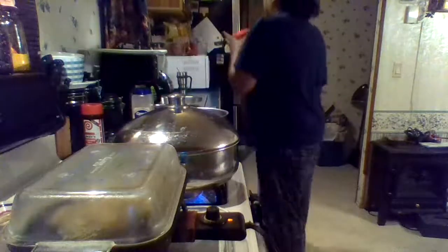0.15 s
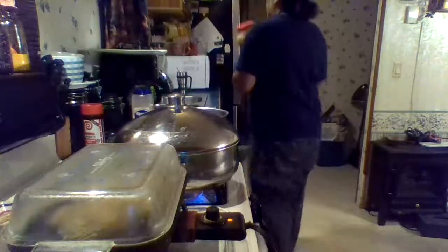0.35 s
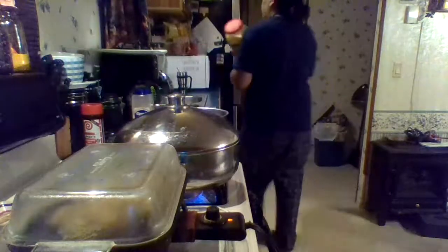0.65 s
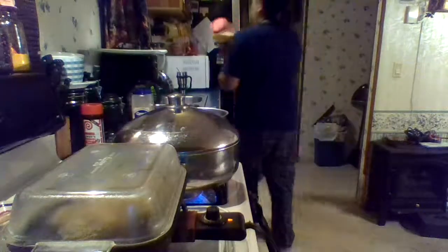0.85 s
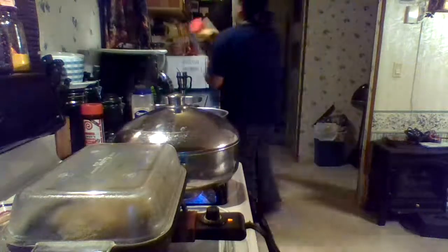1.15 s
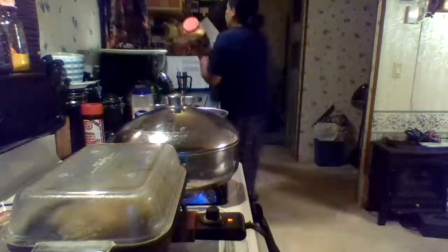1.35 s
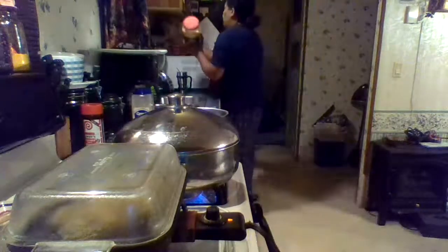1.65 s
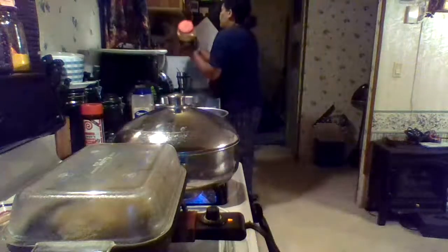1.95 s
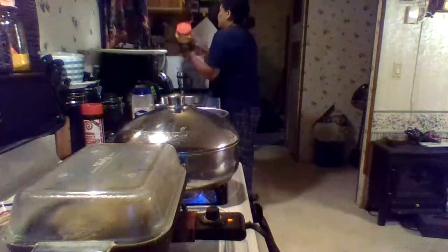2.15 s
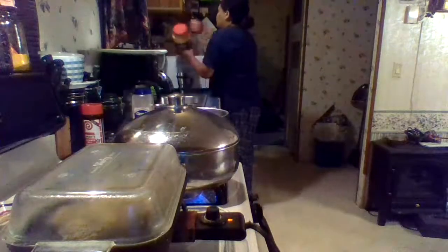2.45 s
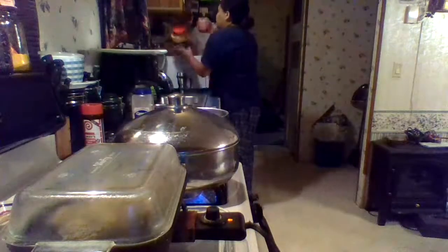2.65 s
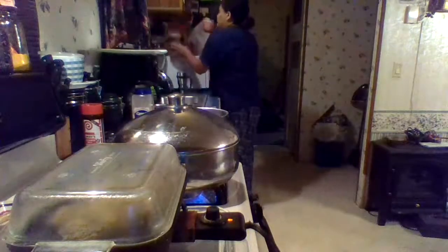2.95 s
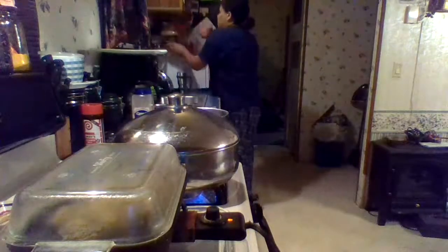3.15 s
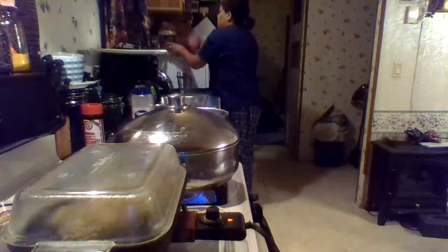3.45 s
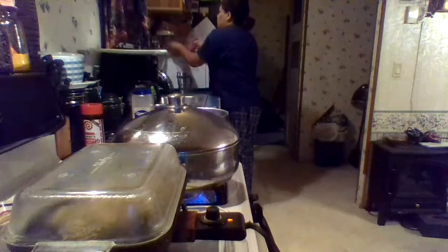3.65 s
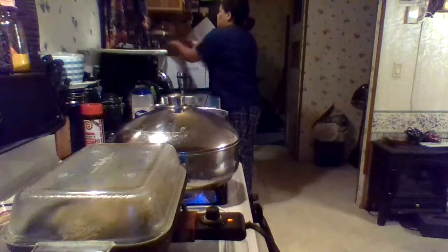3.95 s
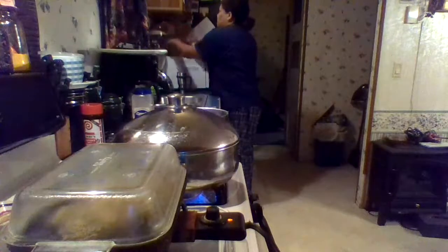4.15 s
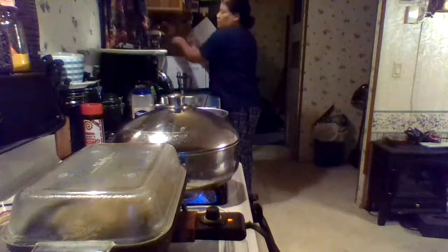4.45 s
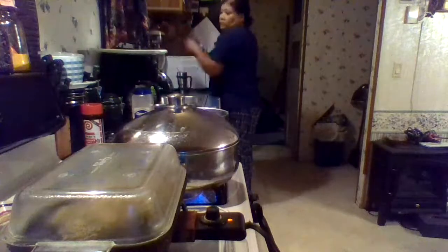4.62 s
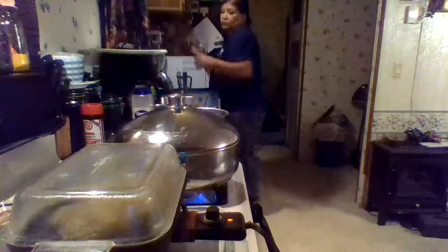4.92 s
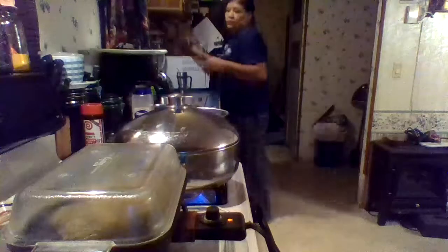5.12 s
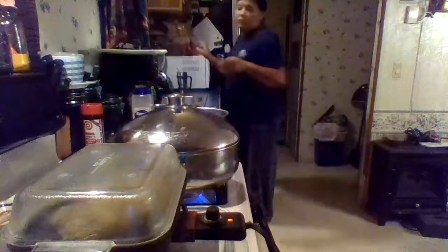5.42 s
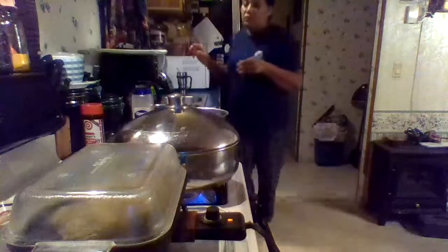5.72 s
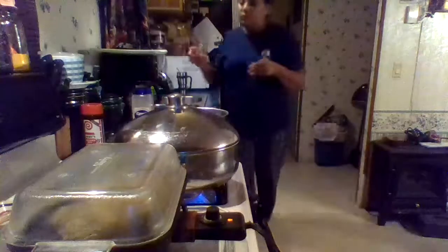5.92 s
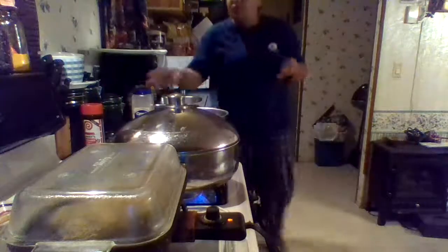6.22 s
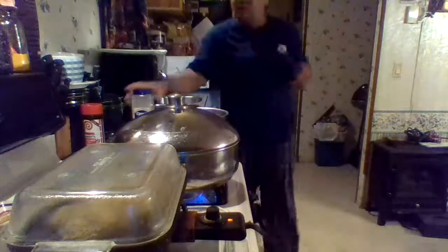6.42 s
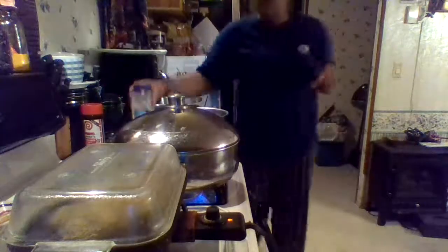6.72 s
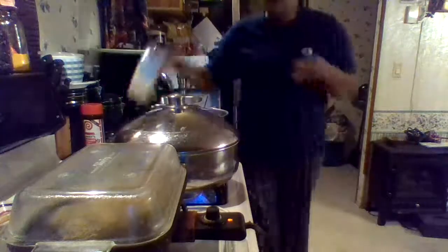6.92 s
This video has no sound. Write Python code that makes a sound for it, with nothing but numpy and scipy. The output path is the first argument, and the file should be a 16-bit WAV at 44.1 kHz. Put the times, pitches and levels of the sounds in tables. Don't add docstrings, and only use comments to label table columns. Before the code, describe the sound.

A small microphone close to a stove picks up fish frying in a covered pan in a small home kitchen. Throughout, oil simmers with fine airy hiss and dense irregular crackle; pockets burst as short wet sputters with a hollow, metallic mid-high ring. Bright droplet ticks and fizzing spits stand out at about 1.1, 2.1, 3.2, 4.7, 5.2 and 5.6 s. Soft jar taps come faintly near 1.7 s, then low dull thumps at 2.7-2.9 s. Boiling eases slightly near 3.6 s, then the loudest pop cracks at 3.7 s, a full, sharp snap with sputtering after it. Duller knocks with a slight clack follow at 4.15-4.3 s, fainter ones near 4.9 s. From 5.7 to 6.3 s pops cluster thickly; sputtering continues to another strong burst at 7 s. A faint burner and room murmur lies beneath; reverberation is short and slight.

```python
import sys
import numpy as np
from scipy import signal
from scipy.fft import rfft, irfft, next_fast_len
from scipy.io import wavfile
from scipy.ndimage import uniform_filter1d, map_coordinates

SR = 44100
rng = np.random.default_rng(int(sys.argv[2]) if len(sys.argv) > 2 else 0)


def amp(db):
    return 10 ** (np.asarray(db, float) / 20)


def write(x):
    x = np.atleast_2d(x).T
    wavfile.write(sys.argv[1], SR, np.round(np.clip(x, -1, 1) * 32767).astype(np.int16))


N = 312228

# frequency in Hz, bandwidth in Hz, level in dB.
PAN_MODES = [(976, 58, -3.5), (1168, 21, -18.5), (1324, 35, -7), (1464, 63, -5), (1552, 94, -4),
             (1720, 60, 0), (1788, 21.8, 4.5), (1870, 32, -0.5), (2116, 38, -2.5), (2278, 157, -3),
             (2540, 270, -11.5), (2417, 15, -8), (2664, 24.5, 0), (2850, 24.5, 2.5), (3150, 21, 0),
             (3290, 70, 0.5), (3420, 30, -7.5), (3627, 34, -2.5), (3970, 38, -12.5), (4480, 36, -15),
             (4200, 23, -4), (4573, 155, -3), (4800, 160, -17), (5083, 66, -3), (6090, 87, -10.5),
             (6820, 99, -5)]
# frequency in Hz, bandwidth in Hz, level in dB.
BOARD_MODES = [(185, 98, -6.5), (226, 68, 3.5), (347, 97, 3), (432, 26, 6), (577, 210, -0.5),
               (656, 17, 5.5), (768, 7.9, -8)]


def unit(x):
    return x / np.sqrt(np.mean(x ** 2) + 1e-20)


def peak_one(rows):
    return rows / np.max(np.abs(rows), axis=1, keepdims=True)


def along(points, hz):
    f, value = np.transpose(points)
    return np.interp(np.log(hz + 1), np.log(f + 1), value)


def over_time(points):
    s, db = np.transpose(points)
    return np.interp(np.arange(N) / SR, s, db)


def wobble(rate):
    knots = rng.standard_normal(int(N * rate / SR) + 4)
    return map_coordinates(knots, [np.arange(N) * rate / SR])


def filtered(x, response):
    n = x.shape[-1]
    m = next_fast_len(n + 4096)
    return irfft(rfft(x, m) * response(np.fft.rfftfreq(m, 1 / SR)), m)[..., :n]


def resonance(f, hz, width_hz):
    return 1j * f * width_hz / (hz * hz - f * f + 1j * f * width_hz)


def body(modes, strength_db):
    hz, width_hz, db = np.transpose(modes)
    gains = amp(db + strength_db) * (-1.) ** np.arange(len(modes))
    return lambda f: gains @ resonance(f, hz[:, None], width_hz[:, None])


def placed(times, rows):
    at = np.round(times * SR).astype(int)[:, None] + np.arange(rows.shape[1])
    return np.bincount(at.ravel(), rows.ravel(), N + SR)[:N]


def sputter(length, size, first_db, grain_db, shape):
    t = np.arange(size) / SR
    noise, grain_noise = rng.standard_normal((2, len(length), size))
    grains = amp(grain_db * unit(uniform_filter1d(grain_noise, size=56)))
    decay = amp(-20 * (t / np.maximum(length, 0.003)[:, None]) ** shape)
    onset = 1 - np.exp(-t / 0.001)
    crack = np.outer(amp(first_db + 0 * length), t == 0)
    return noise * grains * decay * onset + crack


def pan_for_each(count):
    return body(PAN_MODES, rng.normal(0, 4.9, (count, len(PAN_MODES))))


def bursts(hz, length, spread, size, first_db):
    burst = sputter(length, size=size, first_db=first_db, grain_db=5.0, shape=1.71)
    pan = pan_for_each(len(hz))
    lid_echo_s, lid_returns = 0.0043, 0.39

    def near(f, width):
        return resonance(f, hz[:, None], width * hz[:, None]) ** 2

    def response(f):
        pocket = near(f, 0.21 * spread) + amp(-6.5) * near(f, spread) ** 1.41
        pocket = pocket + amp(-35) * resonance(f, 5700, 4700)
        echoes = 1 / (1 - lid_returns * np.exp(-2j * np.pi * f * lid_echo_s))
        return pocket * (pan(f) + amp(-8.5) * resonance(f, 4720, 8500) * echoes)

    return peak_one(filtered(burst, response))


def droplets(hz, width_hz, length, first_db, size):
    tick = sputter(length + 0 * hz, size=size, first_db=first_db, grain_db=1.5, shape=0.9)
    return peak_one(filtered(tick, lambda f: resonance(f, hz[:, None], width_hz) ** 2))


def pops():
    # start in seconds, peak in dB, pocket pitch in Hz, sputter in seconds.
    deep_pockets = [(0.319, -25, 1720, 0.025), (0.359, -29, 3180, 0.03), (0.794, -23.5, 1760, 0.0078),
                    (0.938, -23, 2610, 0.054), (1.316, -24, 2310, 0.018), (1.658, -32, 1720, 0.14),
                    (1.922, -23.5, 3340, 0.028), (2.8, -26.5, 3070, 0.028), (2.8873, -25.5, 2290, 0.022),
                    (3.135, -25, 2060, 0.032), (3.302, -36, 2290, 0.023), (3.7045, -10, 1860, 0.034),
                    (4.026, -31, 2460, 0.045), (4.095, -30, 2330, 0.0086), (4.306, -26.5, 2650, 0.059),
                    (4.811, -25.5, 2350, 0.026), (4.915, -31, 1810, 0.017), (4.94, -25, 2240, 0.022),
                    (5.14, -23, 1390, 0.017), (5.185, -23, 2570, 0.028), (5.482, -31, 2680, 0.075),
                    (5.517, -22, 2760, 0.017), (5.618, -22.5, 1830, 0.027), (5.754, -28, 1690, 0.034),
                    (5.812, -17.5, 1540, 0.0078), (5.88, -25.5, 1905, 0.045), (5.9854, -22.5, 1730, 0.012),
                    (6.2372, -21, 3180, 0.065), (6.589, -23.5, 2290, 0.04), (4.145, -27, 2800, 0.048)]
    # start in seconds, peak in dB, pocket pitch in Hz, sputter in seconds.
    shallow_pockets = [(0.04, -26, 3160, 0.075), (0.384, -23, 2900, 0.04), (0.423, -24, 2210, 0.063),
                       (0.578, -22.5, 3190, 0.1), (0.843, -27, 2240, 0.05), (1.215, -26.5, 3150, .038),
                       (1.253, -22.5, 2770, 0.01), (1.282, -26, 1990, 0.13), (1.376, -21.5, 3080, 0.041),
                       (1.532, -26.5, 3150, 0.061), (1.842, -24, 2850, 0.037), (1.951, -20.5, 3330, 0.032),
                       (1.967, -27, 3360, 0.15), (3.733, -25, 6600, 0.099), (2.234, -24.5, 3270, 0.017),
                       (2.263, -27.5, 2800, 0.069), (2.466, -25, 2880, 0.07), (3.116, -24.5, 1930, 0.034),
                       (3.6588, -21, 2420, 0.17), (3.883, -22, 2920, 0.058), (3.927, -20, 2400, 0.013),
                       (4.234, -23.5, 2990, 0.055), (4.392, -22.5, 2540, 0.027), (4.502, -25, 2020, 0.086),
                       (5.554, -22.5, 2500, 0.06), (6.032, -24, 3630, 0.086), (6.282, -21, 2690, 0.038),
                       (6.6993, -22.5, 2850, 0.056), (6.99, -24, 2880, 0.087), (7.035, -16, 2030, 0.035)]
    # start in seconds, peak in dB, pocket pitch in Hz.
    weak_pockets = [(0.152, -31.5, 2400), (0.284, -28.5, 2140), (1.108, -30.5, 3220), (1.186, -32, 3070),
                    (1.496, -24, 3500), (2.02, -26.5, 2200), (2.184, -30.5, 2500), (2.307, -29.5, 3540),
                    (2.396, -27.5, 2730), (2.502, -24.5, 3150), (2.604, -25, 2490), (2.652, -25.5, 2860),
                    (2.7, -25, 2430), (2.934, -29, 3270), (4.065, -29, 2400), (4.3687, -25.5, 2900),
                    (4.6178, -29, 2540), (4.77, -25, 3770), (4.979, -25.5, 3150), (5.126, -25.5, 2960),
                    (5.193, -29, 1240), (5.5744, -31, 2520), (5.831, -31, 2760), (6.146, -31.5, 2780),
                    (3.495, -35, 3300), (6.386, -28, 3700), (6.492, -25, 2840), (6.773, -28.5, 3150),
                    (6.865, -26, 2676), (2.089, -23, 3090)]
    # start in seconds, peak in dB, pocket pitch in Hz.
    small_pockets = [(0.3511, -29, 5900), (0.5132, -30, 5160), (0.618, -27.5, 3980), (0.9946, -27, 4980),
                     (0.858, -29.5, 4360), (1.3588, -30.5, 3660), (1.5713, -28.5, 4260),
                     (1.8123, -25, 4380), (2.0852, -23, 6570), (2.1864, -25.5, 4650), (2.228, -25, 3900),
                     (2.4755, -26.5, 4480), (3.6785, -32, 4070), (3.7234, -25, 3840), (3.7703, -28.5, 3860),
                     (4.0706, -26.5, 4200), (4.2722, -26.5, 4100), (4.334, -28.5, 4020),
                     (4.7232, -35, 6000), (4.742, -26.5, 4800), (4.9013, -30, 4170), (5.244, -27.5, 4400),
                     (5.8017, -29, 3170), (5.8895, -21.5, 4200), (6.0247, -26, 4070), (6.0427, -18.5, 4200),
                     (6.6099, -27, 4620), (3.402, -38, 4300), (6.8957, -26.5, 4380), (5.865, -27.5, 3600)]
    weak_s = 0.039

    weak_rows = [row + (weak_s,) for row in weak_pockets]
    s, db, hz, length = np.transpose(deep_pockets + shallow_pockets + weak_rows)
    deep = np.arange(len(s)) < len(deep_pockets)
    low_db = np.where(deep, -38 + 0.33 * (db + 23.0), db - 33)
    large = amp(db - 2.0)[:, None] * bursts(hz, length, spread=0.67, size=6144, first_db=24.0)
    low_bursts = bursts(0 * hz + 1150, 1.35 * length, spread=0.98, size=6144, first_db=1.0)
    low = amp(low_db + 5.0)[:, None] * low_bursts
    shake = sputter(2.0 * length, size=6144, first_db=5.0, grain_db=15.0, shape=0.54)
    stove = amp(db - 26)[:, None] * peak_one(filtered(shake, body(BOARD_MODES, 0)))

    freed_db = np.minimum(db - 16.5, -33)
    freed_hz = 4100 * amp(3.5 * rng.random(len(s)))
    s_small, db, hz = np.r_[small_pockets, np.c_[s, freed_db, freed_hz]].T
    small = amp(db - 0.5)[:, None] * bursts(hz, 0.043 + 0 * hz, spread=0.6, size=6144, first_db=27.0)
    return placed(s, large + low + stove) + placed(s_small, small)


def snaps():
    # start in seconds, peak in dB, pitch in Hz.
    single_bubbles = [(0.3238, -29, 1703), (0.3793, -20.5, 2440), (0.386, -26, 3080), (0.3925, -18, 3400),
                      (0.4294, -21, 2220), (0.4383, -19.5, 2090), (1.072, -21.5, 4600),
                      (1.2486, -17.5, 2850), (1.3147, -13, 2390), (1.3912, -21, 3540), (1.8133, -18, 4360),
                      (1.9264, -22.5, 1720), (1.977, -13, 3360), (3.7056, -10.5, 1800), (2.228, -23, 3470),
                      (2.2376, -19, 3240), (2.2527, -23, 4030), (2.27, -17, 3380), (2.467, -22, 2680),
                      (2.477, -19, 2710), (2.5019, -19, 4500), (2.8942, -17.5, 2350), (3.115, -21, 2150),
                      (3.1402, -22.5, 2050), (3.678, -22.5, 4250), (3.7008, -7, 2240), (3.7303, -18, 1830),
                      (3.762, -26, 3920), (3.7712, -21, 4930), (3.7834, -22, 4890), (3.8904, -15, 2670),
                      (3.9256, -30, 2720), (4.0702, -24.5, 4050), (4.0955, -14.5, 2300), (4.235, -20, 2940),
                      (4.309, -24, 2540), (4.3154, -22, 1760), (4.3959, -23, 2400), (4.8195, -25, 2330),
                      (5.184, -19, 2650), (5.196, -25.5, 1500), (5.2517, -21, 4130), (4.6205, -24, 2700),
                      (5.821, -18.5, 2470), (5.832, -17.5, 2800), (5.8823, -22, 3530), (5.891, -15, 4020),
                      (5.9866, -17, 1770), (6.036, -20, 4290), (6.044, -20, 4350), (6.0631, -19, 3530),
                      (6.0702, -19, 4460), (6.2477, -26, 3470), (6.2878, -14.5, 2500), (6.7123, -21, 2730),
                      (6.778, -17.5, 4240), (6.8965, -18, 4470), (6.992, -26, 3020), (7.0083, -15.5, 2710),
                      (7.0569, -21, 2100)]
    # start in seconds, peak in dB, pitch in Hz, sputter in seconds.
    stray_pockets = [(0.347, -28.5, 3240, 0.062), (0.529, -33, 4800, .04), (0.745, -38, 2600, .03),
                     (1.517, -39, 6500, 0.079), (2.84, -34, 4500, 0.083), (2.843, -31.5, 2130, 0.025),
                     (2.986, -34, 4060, 0.021), (3.104, -35.5, 4100, 0.024), (4.307, -40, 1015, 0.028),
                     (4.549, -29.5, 3260, 0.028), (3.602, -39, 4540, 0.035), (4.624, -37, 6240, 0.083),
                     (3.304, -35, 4500, 0.047), (4.691, -41, 5100, .02), (5.095, -32, 4300, 0.028),
                     (5.281, -31, 4400, 0.014), (5.823, -30, 4370, 0.011), (5.93, -32.5, 3300, .03),
                     (5.986, -22, 1790, 0.047), (6.061, -27.5, 2700, 0.036), (6.217, -40.5, 1050, 0.03),
                     (6.312, -23, 2680, 0.019), (0.116, -34.5, 2400, 0.02), (0.168, -33.5, 4370, 0.013),
                     (1.593, -32, 2710, 0.071), (1.726, -32.5, 5300, 0.06), (1.703, -37.5, 2320, 0.092),
                     (4.742, -31, 6300, 0.044), (4.809, -31.5, 5260, 0.025), (4.983, -36, 4570, 0.028),
                     (5.049, -39, 6160, .03), (5.18, -37, 4000, 0.049), (0.784, -36.5, 6300, 0.068),
                     (0.923, -36, 4670, .045), (6.955, -37, 2670, 0.046), (7.022, -27.5, 4200, 0.062)]

    s, db, hz = np.transpose(single_bubbles)
    blow = np.outer(1 + 0 * s, np.arange(4096) == 0)
    pan = pan_for_each(len(s))

    def response(f):
        bubble = resonance(f, hz[:, None], 0.17 * hz[:, None]) ** 3
        return bubble * (1 + amp(1.5) * pan(f))

    bubbles = placed(s, amp(db - 5.5)[:, None] * peak_one(filtered(blow, response)))
    s, db, hz, length = np.transpose(stray_pockets)
    strays = amp(db)[:, None] * bursts(hz, length, spread=0.38, size=6144, first_db=25.5)
    return bubbles + placed(s, strays)


def spits():
    # start in seconds, peak in dB.
    large_drops = [(0.121, -19), (0.329, -16), (0.3626, -13.5), (0.4619, -20), (0.5715, -14.5),
                   (1.1262, -16.5), (1.1602, -18), (1.197, -24), (1.327, -16), (1.449, -23), (1.695, -24),
                   (1.7562, -14), (1.8142, -15), (2.0856, -9), (2.2478, -18), (2.393, -19), (2.4753, -15.5),
                   (2.6054, -21), (2.88, -25), (3.0074, -15.5), (3.2322, -14), (3.439, -20), (3.721, -12),
                   (4.0228, -15), (4.197, -15), (5.1276, -18), (5.527, -27), (5.74, -14), (6.0104, -15.5),
                   (6.351, -13.5)]
    # start in seconds, peak in dB.
    tiny_drops = [(0.177, -21), (0.3112, -24), (0.827, -16), (0.9193, -29), (1.139, -9), (1.2835, -29),
                  (1.3144, -28), (1.475, -16), (1.6152, -15), (2.0353, -17), (2.228, -20), (2.343, -27),
                  (2.642, -17), (2.6678, -33), (2.9744, -14), (3.1318, -17), (3.2955, -16), (3.3917, -20),
                  (3.5109, -25), (4.7152, -10), (4.997, -12), (5.1444, -29), (5.223, -9.5), (5.6194, -10),
                  (6.994, -20)]

    s, db = np.transpose(large_drops)
    hz = 11000 * amp(2.13 * rng.random(len(s)))
    length = 0.016 * amp(0.5 * (db + 28.5))
    crack_db = np.clip(19 - 0.98 * (db + 14.0), 6, 30)
    large = placed(s, amp(db - 2.5)[:, None] * droplets(hz, 9500, length, crack_db, size=4096))
    s, db = np.transpose(tiny_drops)
    hz = 10500 * amp(4.7 * rng.random(len(s)))
    return large + placed(s, amp(db - 10.0)[:, None] * droplets(hz, 6700, 0.0051, 7.5, size=1024))


def below_edge(f):
    return 1 / np.sqrt(1 + (f / 15750) ** 360)


def needles():
    # start in seconds, peak in dB, level above 15.75 kHz in dB.
    sharp_cracks = [(.1196, -19, -19), (1.1963, -15.5, -49), (1.6935, -24, -25), (1.8128, -15, -40),
                    (2.0843, -21, -31), (2.087, -11, -30), (2.0891, -20, -36), (2.2463, -18, -37),
                    (2.392, -15.5, -20), (2.605, -22, -20), (2.8777, -17, -32), (3.4391, -26, -28),
                    (3.7, -21, -45), (3.9095, -26, -50), (4.1116, -26, -50), (4.6344, -20, -53),
                    (5.1268, -16.5, -26), (5.5283, -20, -32), (5.7473, -16, -50), (6.3779, -15, -52),
                    (6.591, -23, -52), (6.767, -31, -50)]

    s, db, edge_db = np.transpose(sharp_cracks)
    cracks = droplets(13000 + 0 * s, 11000, 0.0012, 20, size=512)

    def reach(f):
        return below_edge(f) + amp(edge_db + 8)[:, None] * (1 - below_edge(f))

    delayed = np.roll(cracks, 64, axis=1)
    return placed(s, amp(db + 2.5)[:, None] * filtered(delayed, reach))


def crackle(rate, spread_db):
    occurs, sign, size = rng.random((3, N))
    return unit((occurs < rate / SR) * np.sign(sign - 0.5) * amp(-spread_db * np.log(size + 0.01)))


def patchy(depth_db, bins, frames):
    z = signal.stft(rng.standard_normal(N), nperseg=1024)[2]
    field = uniform_filter1d(rng.standard_normal(z.shape), size=bins, axis=0)
    field = uniform_filter1d(field, size=frames, axis=1)
    return signal.istft(z * amp(depth_db * unit(field)), nperseg=1024)[1][:N]


def high_modes(depth_db, bins):
    ragged = depth_db * unit(uniform_filter1d(rng.standard_normal(4096), size=bins))
    return lambda f: amp(np.interp(f, np.linspace(0, SR / 2, len(ragged)), ragged))


def simmering():
    # frequency in Hz, spectral level in dB.
    simmer_colour = [(410, -5), (700, -9), (1400, -4.5), (1770, -10.5), (1950, -5), (2100, -7.5),
                     (3230, -2.5), (7920, -6), (9000, 2), (11700, 6.5), (19800, -120)]

    when, pitch, size = rng.random((1300, 3)).T
    hz = 1200 * amp(16 * pitch ** 0.6)
    bubbles = bursts(hz, 0.013 + 0.017 * size, spread=0.7, size=2048, first_db=23)
    crowd = placed(when * N / SR, amp(9.6 * size)[:, None] * bubbles)
    crowd = filtered(crowd, lambda f: amp(along(simmer_colour, f)))
    pan = body(PAN_MODES, 0)

    def wash_response(f):
        return amp(along(simmer_colour, f)) * (pan(f) + amp(1.0)) * resonance(f, 2860, 7500)

    wash = filtered(patchy(6.2, bins=14, frames=3), wash_response)
    return unit(crowd) + 0.63 * unit(wash)


def rim_hiss():
    # frequency in Hz, spectral level in dB.
    hiss_colour = [(2940, -40), (5000, -19), (6710, -3.5), (7960, -15), (9430, 3.5), (11300, 3),
                   (13300, 9.5), (15700, 6.5), (16300, -46), (16500, -57)]

    when, pitch, size = rng.random((900, 3)).T
    drops = droplets(5000 * amp(10.5 * pitch), 3400, 0.0037 + 0.0077 * size, 6.6, size=1024)
    drops = placed(when * N / SR, amp(6.1 * size ** 2)[:, None] * drops)
    fine = 1.2 * crackle(rate=5000, spread_db=8)
    fine = fine + 1.1 * patchy(depth_db=3, bins=40, frames=2) + 1.2 * unit(drops)
    lid = high_modes(0.62, bins=9)
    return unit(filtered(fine * amp(2.24 * wobble(30)), lambda f: amp(along(hiss_colour, f)) * lid(f)))


def frying(activity):
    # time in seconds, level in dB.
    boiling = [(0.0, -41), (0.89, -39), (1.03, -36.5), (2.15, -39.5), (2.46, -40.5), (2.7, -41.5),
               (3.3, -38), (3.62, -45), (3.74, -36.5), (4.14, -36), (4.69, -42.5), (6.01, -37.5),
               (6.27, -40), (7.08, -36.5)]

    simmer_db = over_time(boiling)
    hiss_db = -42.5 + 0.87 * (simmer_db - simmer_db.mean())
    simmer = amp(simmer_db - 5.5) * simmering() * (0.69 + 0.22 * activity ** 1.2)
    hiss = amp(hiss_db - 5.5) * rim_hiss() * (1 + 0.77 * activity ** 0.15)
    return simmer + hiss


def knocks():
    # start in seconds, peak in dB, pitch in Hz, clack over thump in dB.
    contacts = [(1.693, -49.5, 124, 16.5), (1.709, -44, 122, 10.5), (1.753, -38.5, 107, 4),
                (2.724, -30.5, 68, -8.5), (2.742, -24, 71, -13.5), (2.766, -34, 107, -22),
                (2.799, -42, 90, -13), (2.825, -34.5, 111, -23), (2.838, -29, 72, -19),
                (2.868, -35.5, 90, -18), (2.886, -38, 69.5, -20), (2.929, -41.5, 117, -15),
                (4.154, -29.5, 80, -1), (4.175, -31, 107, 2.5), (4.221, -40, 105, -4),
                (4.255, -28, 118, -10.5), (4.285, -38, 96, -13), (4.869, -48, 246, 13), (4.909, -50, 96, 8),
                (5.41, -57.5, 266, 20.5), (6.523, -40, 99, -15), (6.504, -43, 60, -13),
                (6.701, -45, 265, -5)]

    s, db, hz, clack_db = np.transpose(contacts)[:, :, None]
    clack_hz = 365 * amp(0.4 * clack_db)
    t60_s = 0.075 * amp(-0.097 * (db + 29.0))
    t = np.arange(8192) / SR
    fade = amp(-60 * t / t60_s) * (1 - np.exp(-t / 0.0038))
    thump = fade * np.sin(2 * np.pi * hz * t)
    loose = sputter(0 * s[:, 0] + 0.32, size=8192, first_db=-30, grain_db=8.5, shape=3.4)
    rattle = np.sqrt(fade * t) * loose
    board = body(BOARD_MODES, 0)
    clack = filtered(rattle, lambda f: board(f) * (resonance(f, clack_hz, 89) + amp(-9)))
    return placed(s[:, 0], amp(db) * (peak_one(thump) + amp(clack_db) * peak_one(clack)))


def taps():
    # start in seconds, peak in dB, pitch in Hz.
    jar_taps = [(1.705, -39, 665), (1.72, -39, 660), (1.718, -36, 340), (1.74, -37, 323), (1.765, -37, 650),
                (1.785, -40, 388), (2.135, -43, 637), (2.72, -41, 378), (2.74, -40, 618),
                (2.755, -39.5, 626), (2.768, -35, 339), (2.85, -46, 660), (2.872, -37, 249),
                (4.155, -37.5, 596), (4.168, -34, 483), (4.195, -39, 410), (4.206, -30, 423),
                (4.238, -39, 588), (4.882, -44, 627), (4.9, -37, 592), (4.922, -38, 620), (4.945, -50, 624),
                (5.985, -39, 594), (6.39, -42, 402), (6.415, -48, 434)]

    s, db, hz = np.transpose(jar_taps)[:, :, None]
    t60_s, rise_s = 0.082, 0.0015
    t = np.arange(4096) / SR
    fade = amp(-60 * t / t60_s) * (1 - np.exp(-t / rise_s))
    return placed(s[:, 0], amp(db) * peak_one(fade * np.sin(2 * np.pi * hz * t)))


def murmur():
    # frequency in Hz, spectral level in dB.
    murmur_colour = [(15, -45), (25, -9), (48, -16), (85, -13.5), (124, -4.5), (144, -8), (163, -27.5),
                     (335, -2), (383, -1.5), (432, 1), (472, -9.5), (494, -17.5), (628, -2), (775, -19),
                     (900, -10.5), (1170, -8), (1980, -120)]
    # time in seconds, level in dB.
    loudness = [(0.0, -65), (1.99, -62.5), (2.23, -66), (4.1, -58.5), (4.55, -65.5), (5.4, -60.5),
                (7.08, -63)]

    lumps = patchy(4, bins=3, frames=3) * amp(1.5 * wobble(14))
    return amp(over_time(loudness) + 5.5) * unit(filtered(lumps, lambda f: amp(along(murmur_colour, f))))


def kitchen(x):
    # frequency in Hz, reverberation time (60 dB) in seconds.
    room_t60 = [(200, 0.43), (2000, 0.2), (12000, 0.055)]

    hz, t, z = signal.stft(rng.standard_normal(SR // 2), SR, nperseg=256)
    decay = amp(-60 * t / along(room_t60, hz)[:, None])
    tail = signal.istft(z * decay, SR, nperseg=256)[1]
    delayed = np.pad(x, (200, 0))
    return signal.fftconvolve(delayed, tail / np.linalg.norm(tail))[:N]


def scene():
    pockets = pops()
    activity = unit(np.sqrt(np.abs(uniform_filter1d(pockets ** 2, size=400))))
    near = pockets + snaps() + spits() + knocks() + taps()
    steady = frying(activity) + murmur()
    heard = near + amp(-17.0) * kitchen(near) + steady
    return (filtered(heard, below_edge) + needles())[None]


def top_cut(x):
    return signal.sosfilt(signal.butter(12, 16980, fs=SR, output="sos"), x)


def record(dry):
    mix = filtered(dry, lambda hz: 1 / np.sqrt(1 + (38 / (hz + 1)) ** 6))
    return top_cut(mix)


dry = scene()
out = record(dry)
write(out)
```